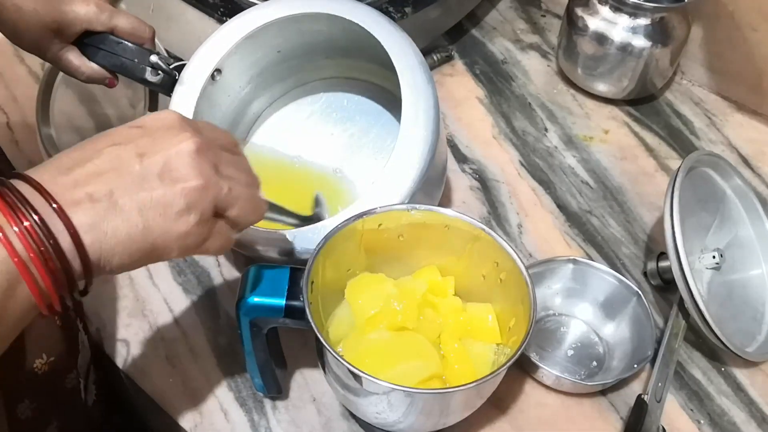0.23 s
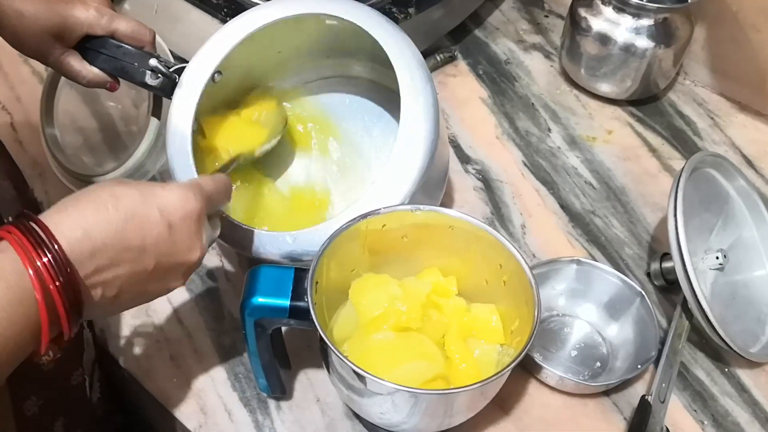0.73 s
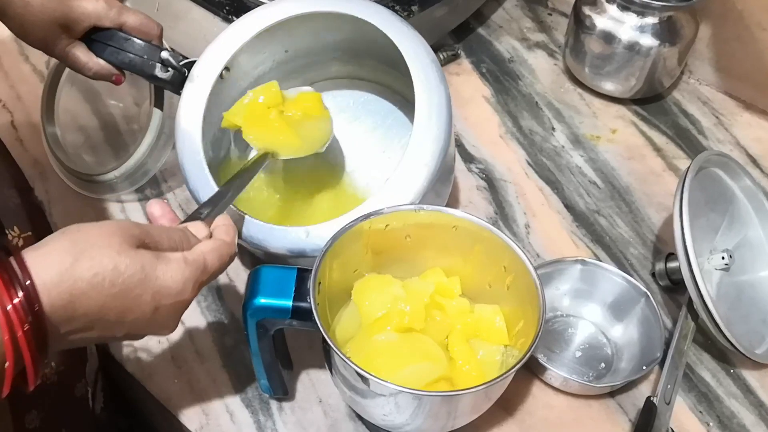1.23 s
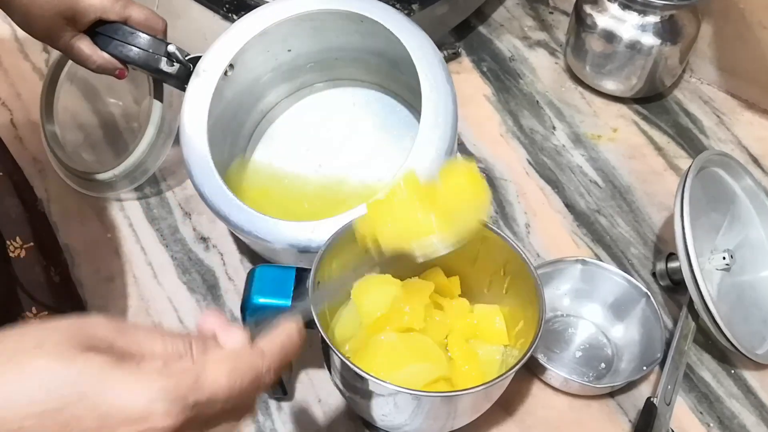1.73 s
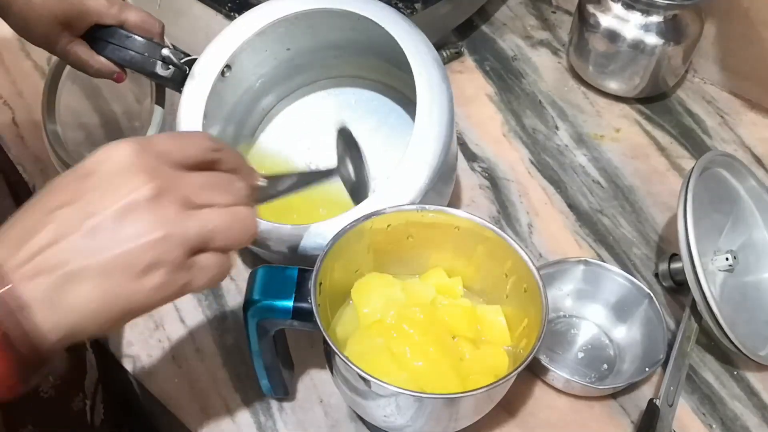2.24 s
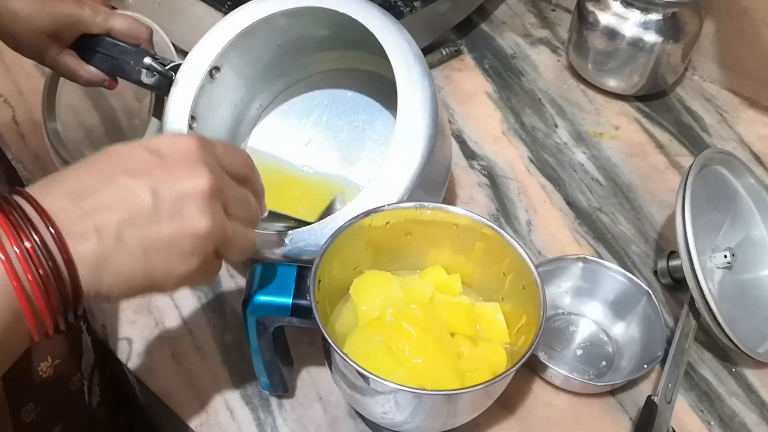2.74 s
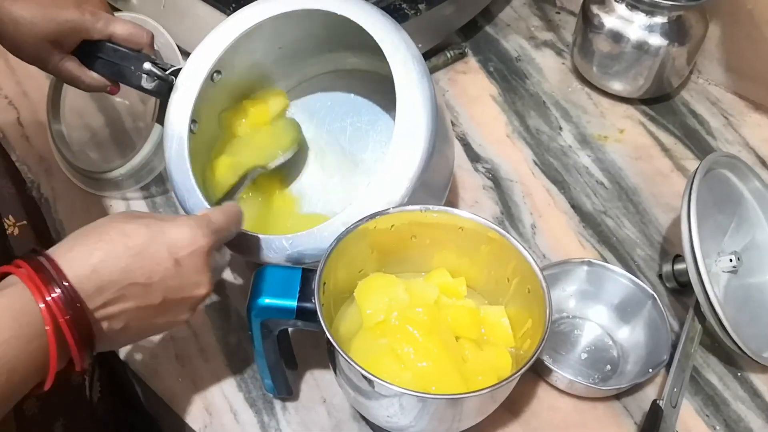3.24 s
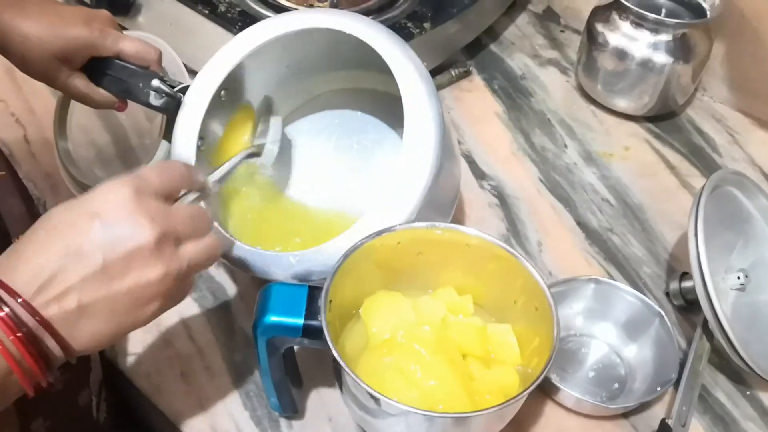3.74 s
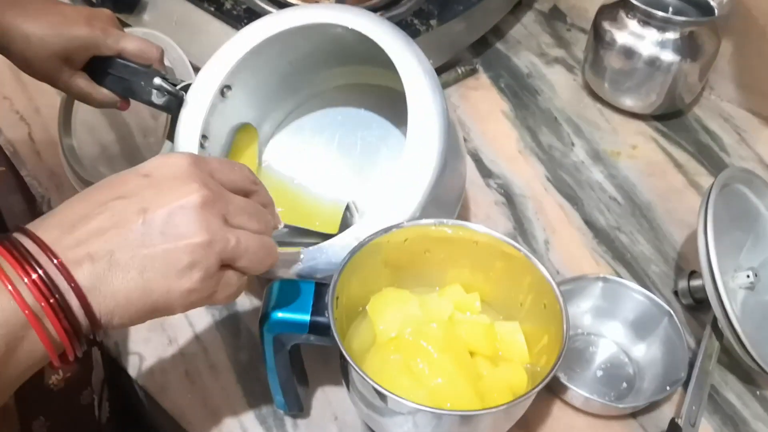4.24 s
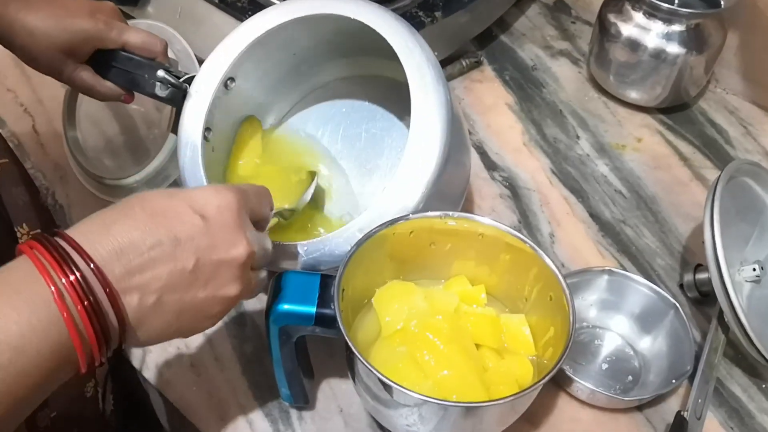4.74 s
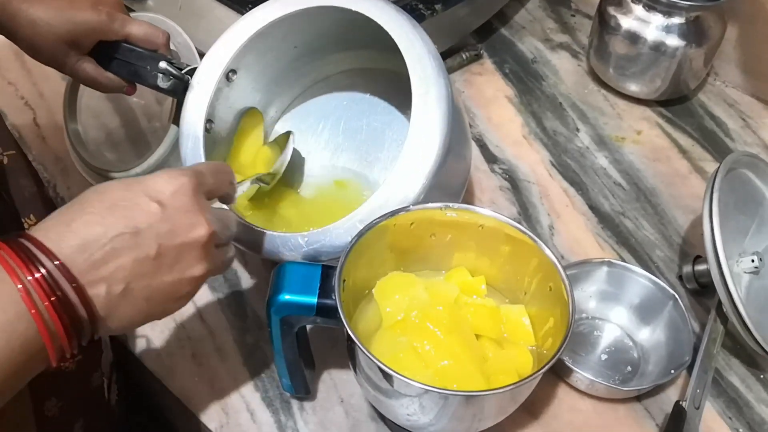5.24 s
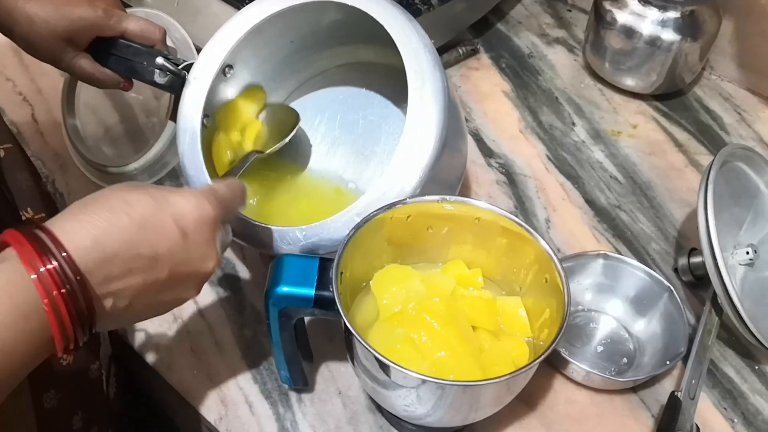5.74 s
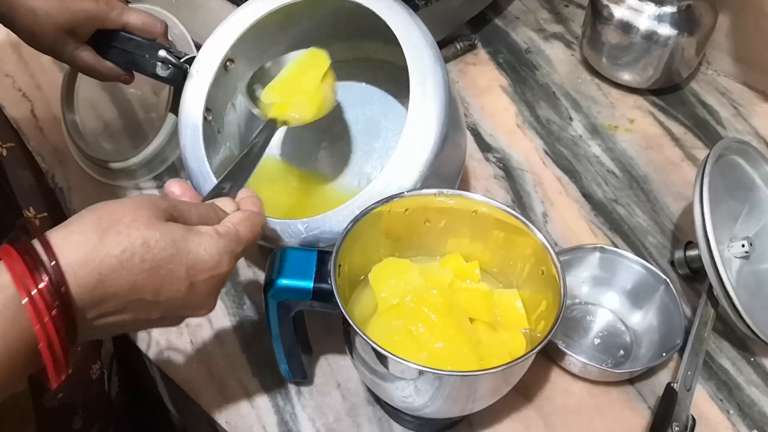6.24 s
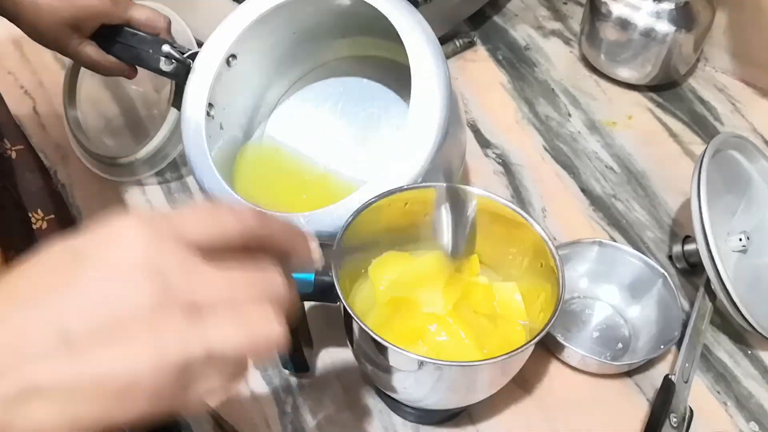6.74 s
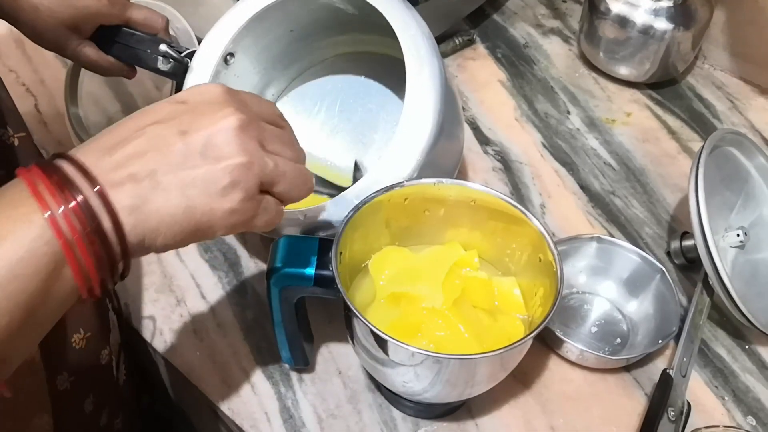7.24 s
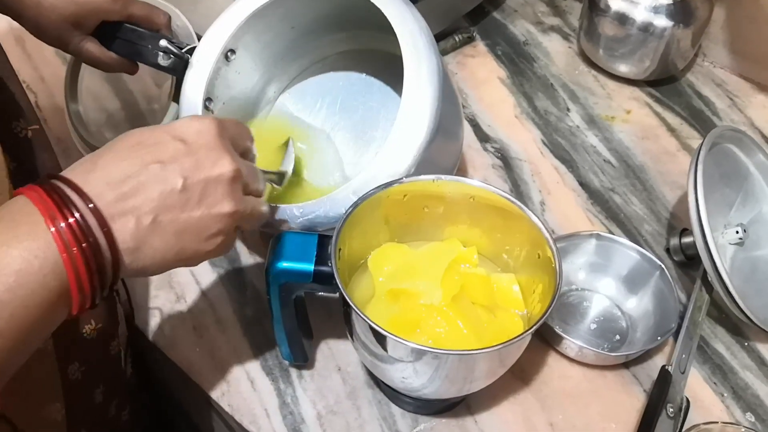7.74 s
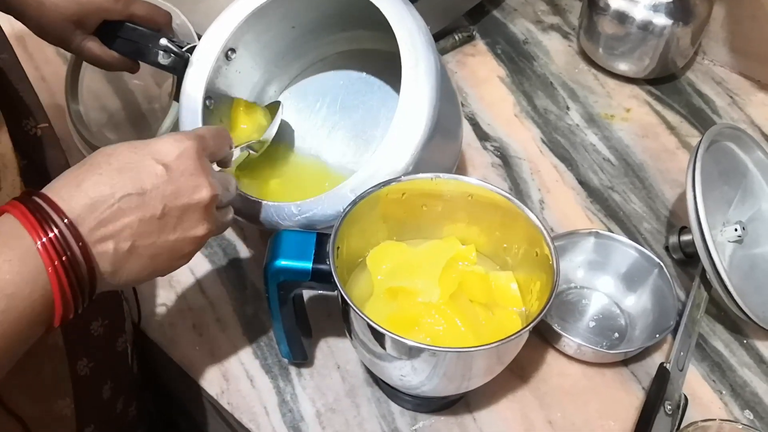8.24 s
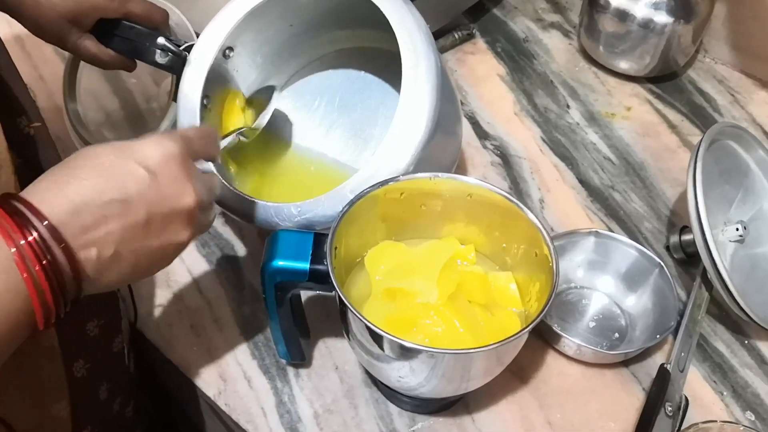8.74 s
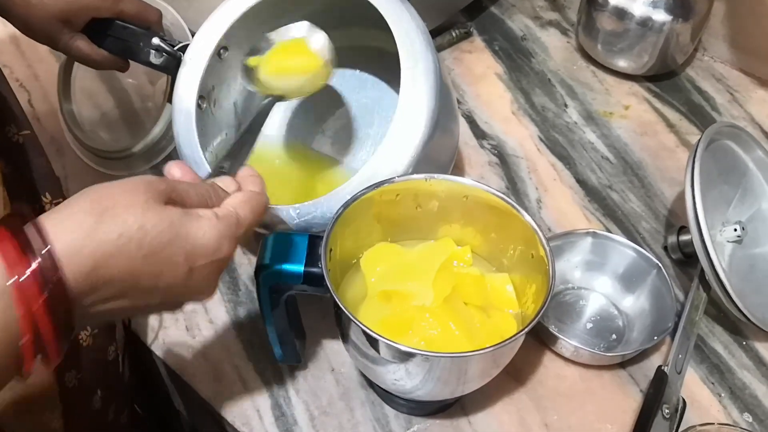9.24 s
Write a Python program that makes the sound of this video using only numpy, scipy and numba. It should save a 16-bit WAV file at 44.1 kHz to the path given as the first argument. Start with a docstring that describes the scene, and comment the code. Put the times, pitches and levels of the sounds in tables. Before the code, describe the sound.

Close stereo sound of fruit being ladled from a metal pot in a small, reflective kitchen. Short gritty metallic scrapes with a slightly singing edge come in groups, mixed with hollow knocks and bright, quickly damped clanks. Between scoops it falls almost silent, leaving tiny wet crackles, plops and high glassy bangle clinks over soft room air and a low hum. The brightest clanks come near six and nine seconds.

```python
"""Scooping fruit in a small kitchen

A steel ladle scoops soft boiled fruit out of a pressure cooker. Its knocks make ladle and pot ring together.
Scrapes are noisy friction fed through the pot's fixed resonances and the ladle's sliding ones.
Drips are short splats with a bubble tone, wet pulp crackles, and glass bangles clink as ringing tones.
Soft air noise and a quiet electric hum run throughout; hard walls add a short echoing tail."""
import sys
import numpy as np
from scipy import signal
from scipy.fft import rfft, irfft, next_fast_len
from scipy.io import wavfile
from numba import njit

SR = 44100
rng = np.random.default_rng(int(sys.argv[2]) if len(sys.argv) > 2 else 0)


def master(y):
    """Save y as 16-bit WAV."""
    cut = np.clip(np.atleast_2d(y).T, -1, 1)
    pcm = np.round(cut * 32767)  # scale
    wavfile.write(sys.argv[1], SR, pcm.astype(np.int16))


N = 418509
TIME = np.arange(N) / SR   # s

# soft air noise in the room, before its overall level: (f/Hz, level per Hz/dB)
AIR = [(15, -55), (25, -21.5), (70, -12), (92, -6.5), (217, -7.5), (344, -1.5), (516, -6.5), (1020, -11.5),
       (1290, -12.5), (1840, -18), (7510, -27.5), (9070, -23), (16000, -39.5)]
# how alike the air sounds on the left and right: (f/Hz, correlation)
AIR_LIKENESS = [(100, 0.9), (450, 0.78), (2500, 0)]
AIR_DB = -57.72
HUM_HZ, HUM_DB = 101, -69

# edges of the registers (pitch ranges) of a knock: f/Hz
KNOCK_REGISTERS_HZ = [330, 1000, 1500, 2700, 6500, 11000, 16000]
# ladle knocks on the cooker, before the knocks' shared gain: (t/s, level/dB, hardness/dB per octave,
# boom of the pot wall/dB, clank of the ladle bowl/dB, favoured mode f/Hz, its boost/dB,
# ring length factor, left minus right/dB)
KNOCKS = [(0.061, -29, -1, -5.5, 1.5, 1920, 8.5, 0.19, 1), (0.26, -27, 2, 5, -19, 3175, 11, 0.94, 1.5),
          (0.341, -31.5, 1.5, -10, -20, 6930, 26, 0.36, 2), (2.515, -58.5, -1, 5.5, -12, 1210, 18, 1, 1),
          (2.563, -32.5, -.5, -11.5, -1.5, 3535, 0, .62, 2),
          (3.227, -49, -2.5, -3.5, -4, 1210, -11, 0.94, 3), (3.33, -33, 1.5, 2.5, 2, 2190, 19, 0.44, -1),
          (3.731, -40.5, 3.5, -15, -6, 7607, 10, 0.23, 1), (4.218, -46, -3.5, -5, 3, 2190, 10, 0.57, .5),
          (5.861, -26, 0.5, -17.5, -7, 4450, 14, 0.52, 1),
          (6.091, -22, 3, -17.5, -12.5, 7876, 9.5, 0.55, 3), (7.265, -26.5, 1, -.5, -27, 1210, 11, 0.45, 0),
          (7.352, -35.5, 0, -.5, -25, 5420, 5.5, 0.34, -0.5),
          (7.451, -34.5, -1, -13, -13, 3040, 17, 0.27, 0), (7.801, -52.5, -5, 4, -8, 1265, 29, 0.84, -4.5),
          (8.03, -69, -8, 6, -10, 1265, 38, .8, -7), (8.106, -66.5, -6, 7.5, -2, 1265, 29, 0.73, -4),
          (9.074, -23.5, 4, -14, -8.5, 8560, 25, 0.59, -1)]
THUD_DB, TOP_DB = -13, -12.5   # every knock is weaker in its lowest and highest register
# ringing tones (modes) of the cooker: (f/Hz, relative level/dB, time to fall 60 dB at full ring length/s)
COOKER = [(497, -7, .4), (522, -10, .25), (1210, 0, .55), (1265, -13, .2), (1920, -4, .1), (2190, -9, .15),
          (2645, -23, .2), (3175, -9, .2), (3435, -6, .27), (3535, -4, .3), (3825, -9, .33),
          (4269, -10, .22), (4455, -11, .25), (4862, -10, .25), (5420, -11, .42), (5636, -7, .17),
          (6570, -10, .5), (6930, -6, .16), (7607, -8, .42), (7876, -6, .22), (8560, -6, .11),
          (9211, -7, .28), (9920, -8, .2), (10500, -9, .2), (11940, -13, .2), (13080, -14, .2),
          (14680, -17, .15)]
# ladle resonances at its rest pitch: (f/Hz, width/Hz, relative level/dB)
LADLE = [(800, 120, -11), (970, 40, -8), (1265, 25, -2), (2030, 28, 2), (3040, 40, -3), (3400, 120, -10),
         (4470, 45, -6), (6230, 70, -11), (6740, 100, -10), (7210, 80, -9), (8100, 220, -11),
         (9160, 120, -11)]
LADLE_PITCH_HZ = 2030   # rest pitch
# broad colour of rasps and crashes inside the pot: (f/Hz, relative level per Hz/dB)
FRICTION = [(250, -12.5), (480, -2), (800, -5.5), (1200, -3.5), (1600, -12), (2100, -10.5), (2550, -13),
            (3300, -2), (4000, -7.5), (5000, -5), (6500, -3), (9000, 2), (11500, -10), (15500, -16.5)]

# ladle strokes, each one push that bites, peaks and eases off while the ladle's pitch glides:
# (start t/s, peak t/s, end t/s, peak level/dB, easing/dB, drag on the base/dB, grit/dB, broad rasp/dB,
# first pitch f/Hz, last pitch f/Hz)
STROKES = [(0.097, 0.093, .255, -42, 6, 0, -8.5, -6, 1862, 2015),
           (.285, 0.306, .36, -34.5, 0, -6, 2, 6, 1934, 1912),
           (0.369, 0.383, .54, -35, 3, -1.5, -5, -1, 1930, 2056),
           (0.547, 0.568, .70, -35.5, 14.5, 1, -0.5, 0, 2072, 2124),
           (0.769, 0.793, .82, -45.5, 3.5, 7, 6, -5.5, 2063, 2090),
           (.83, 0.887, 1.02, -35.5, 28, -2.5, -4, 6, 2090, 1920),
           (2.70, 2.74, 2.915, -31.5, 17.5, -2, -5.5, -10, 2043, 2123),
           (2.939, 2.946, 3.19, -41.5, 13.5, -0.5, -2.5, -7.5, 2036, 2064),
           (3.404, 3.517, 3.58, -33.5, 16.5, -9.5, -3.5, -3, 1840, 2086),
           (4.25, 4.26, 4.32, -53.5, 1.5, 5.5, -9, -8, 2040, 1980),
           (4.328, 4.382, 4.45, -45, 11.5, 5, -6, -4, 2000, 1980),
           (4.463, 4.505, 4.56, -39, 30, -0.5, -7, -10, 2000, 1927),
           (4.63, 4.636, 4.86, -45.5, 10, -6, -5.5, -15.5, 2009, 2040),
           (6.996, 7.043, 7.245, -59, -2, -15, 5.5, 30, 2010, 2070),
           (7.466, 7.469, 7.57, -34, 27.5, -8.5, -3, -31, 2024, 1957),
           (7.61, 7.653, 7.79, -43, 9, -7, -3, -23, 2036, 2049),
           (7.816, 7.838, 7.98, -66, 5, 16, 11.5, -3, 2070, 2098),
           (8.009, 8.133, 8.20, -65, 12, 17, 14.5, -13, 2025, 2086),
           (8.338, 8.387, 8.48, -57.5, 14, 2, 0.5, -8, 1987, 2020),
           (8.811, 8.917, 9.04, -35.5, 14.5, -7, 0, 1.5, 1892, 2027)]
BITE_DB = 12   # pressure grows by this much from the start of a stroke to its peak
DRAG_FOLLOWS = 0.69   # share of the pressure swing that the low drag follows

# soft fruit sliding in the ladle and into the jar: (start t/s, end t/s, level/dB)
SQUELCHES = [(1.098, 1.804, -59.5), (1.9, 2.165, -55.5)]

# edges of the registers of a drip: f/Hz
DRIP_REGISTERS_HZ = [400, 1500, 6000, 15000]
# drips and plops of fruit, before the drips' shared gain: (t/s, bubble f/Hz, level/dB, sharpness/dB per octave)
DRIPS = [(1.111, 2140, -64, 9.5), (1.206, 8440, -62.5, -0.5), (1.256, 4400, -69, 11),
         (1.416, 4340, -58, 6.5), (1.452, 3480, -63.5, 11), (1.498, 1210, -56, 1), (1.516, 8550, -65, 3.5),
         (1.592, 1210, -52.5, 3.5), (1.712, 3350, -67.5, 2), (1.977, 8960, -57.5, -1),
         (2.065, 1870, -58, -5.5), (2.885, 2070, -53.5, 1.5), (4.927, 7440, -75, 4), (7.091, 7300, -64, 2)]

# edges of the registers of a bangle clink: f/Hz
CLINK_REGISTERS_HZ = [8000, 11500, 16000]
# bangle clinks, before the favoured register is lifted: (t/s, favoured mode f/Hz, level/dB)
CLINKS = [(2.097, 10600, -56), (2.304, 13150, -70), (2.518, 8530, -63.5), (3.141, 13150, -46.5),
          (3.254, 15550, -48.5), (3.266, 10120, -42), (3.662, 9870, -58.5), (3.719, 13150, -49),
          (3.853, 8530, -58.5), (5.846, 13150, -53), (5.894, 14680, -46.5), (6.013, 10120, -57),
          (6.694, 9168, -44), (6.957, 13150, -56), (6.99, 10600, -54.5)]
# glass bangle modes: (f/Hz, relative level/dB, time to fall 60 dB at full ring length/s)
BANGLES = [(8530, -20.5, 0.15), (9168, -15, 0.41), (9870, -15, 0.14), (10120, -9.5, 0.068),
           (10600, -14.5, .1), (13150, -16, .12), (14680, 9, 0.13), (15550, 3, .07)]

# the pot stands to the right, which changes the balance of the sides: (f/Hz, left minus right/dB)
SHADE = [(1200, -0.5), (2300, 1.5), (5000, 0), (8600, -5.5), (15000, -4)]
CUTOFF_HZ = 15900


def from_db(db):
    """Turn decibels into a gain."""
    return 10 ** (np.asarray(db) / 20)


def rms_one(x):
    """Scale a sound to an average strength (rms) of 1."""
    return x / np.sqrt(np.mean(x ** 2) + 1e-20)


def at_hz(points, hz):
    """Read a table between its points, on a log-frequency axis."""
    known_hz, values = np.transpose(points)
    return np.interp(np.log(hz + 1e-9), np.log(known_hz), values)


def band(x, low, high):
    """Keep the frequencies between low and high, in Hz."""
    return signal.sosfilt(signal.butter(4, [low, high], "band", fs=SR, output="sos"), x)


def colour(x, spectrum):
    """Give a sound a broad, smooth spectrum."""
    size = next_fast_len(x.shape[-1])
    gains = from_db(at_hz(spectrum, np.fft.rfftfreq(size, 1 / SR)))
    return irfft(rfft(x, size) * gains, size)[..., :x.shape[-1]]


def drift(t, rate):
    """Wander at random with a spread of about 1, taking a new value `rate` times a second."""
    steps = (t - t[0]) * rate
    return np.interp(steps, np.arange(4096), rng.standard_normal(4096))


def add(out, start_s, sound):
    """Mix a stereo sound in at its time."""
    at = max(round(start_s * SR), 0)
    out[:, at:at + sound.shape[1]] += sound[:, :N - at]


def room_air():
    """Soft steady air noise, plus an electric hum that wavers a little in pitch and level."""
    size = next_fast_len(N)
    hz = np.fft.rfftfreq(size, 1 / SR)
    alike = at_hz(AIR_LIKENESS, hz)
    mid, side = rfft(rng.standard_normal((2, size))) * from_db(at_hz(AIR, hz))
    # the share of side sound sets how alike left and right are
    side = np.sqrt((1 - alike) / (1 + alike)) * side
    air = irfft(mid + side * [[1], [-1]], size)[:, :N]
    air = air / np.std(air.mean(axis=0))
    hum = np.sin(2 * np.pi * HUM_HZ * TIME + 0.5 * drift(TIME, 17))
    hum = hum * from_db(0.5 * drift(TIME, 8.8))
    return from_db(AIR_DB) * air + from_db(HUM_DB) * rms_one(hum)


def register_levels(edges, level_db, tilt_db=0, favoured_hz=0, lift_db=0):
    """Set each register's level: harder contact tilts it upward, and the favoured mode's register is lifted."""
    low, high = np.array(edges[:-1]), np.array(edges[1:])
    centres = np.sqrt(low * high)
    octaves = np.log2(centres / centres[len(low) // 2])
    return level_db + tilt_db * octaves + lift_db * ((low <= favoured_hz) & (favoured_hz < high))


def strike(modes, edges, levels_db, favoured_hz, boost_db, length, crash_db, crash_t60, rise_s):
    """One blow: clear modes over a crash of dense short ones; contact sets how hard each register is driven."""
    t = np.arange(SR // 2) / SR
    hz, mode_db, t60 = np.transpose(modes)
    favoured = np.arange(len(hz)) == np.argmin(abs(hz - favoured_hz))
    gains = from_db(mode_db + boost_db * favoured + rng.normal(0, 2, len(hz)))
    # contact loads what is struck and detunes the modes a little at each blow, the high ones most
    hz = hz * (1 + np.minimum(hz / 2e6, .003) * rng.standard_normal(len(hz)))
    # high modes radiate in lobes, so they reach the two sides out of phase
    lobes = rng.standard_normal((2, len(hz))) * np.minimum(hz / 6000, .5)
    phases = rng.uniform(0, 2 * np.pi, len(hz)) + lobes
    fading = from_db(-60 * t / (t60[:, None] * length))
    rings = np.sin(2 * np.pi * hz[:, None] * t + phases[..., None]) * gains[:, None] * fading

    common = rms_one(colour(rng.standard_normal(len(t)), FRICTION))
    own = rms_one(colour(rng.standard_normal((2, len(t))), FRICTION))
    rattle_db = 2 * drift(t, 500)
    early, out = slice(0, SR // 30), 0
    for low, high, level_db in zip(edges, edges[1:], levels_db):
        apart = min(low / 3500, 1)   # higher registers differ more between the sides
        # the low dense modes die more slowly; crash_t60 holds for a register starting at 6000 Hz
        dying = from_db(rattle_db - 60 * t / crash_t60 * (low / 6000) ** .22)
        crash = (np.sqrt(1 - apart) * common + np.sqrt(apart) * own) * dying
        crash = band(crash, low, high)
        sound = rings[:, (hz >= low) & (hz < high)].sum(axis=1) + from_db(crash_db) * crash
        sound = sound * (1 - np.exp(-t / rise_s))
        # the level is that of the first thirtieth of a second
        out = out + from_db(level_db) * sound / np.sqrt(np.mean(sound[:, early] ** 2))
    return out


def knocks(gain_db=-2.0, ladle_db=-5):
    """The ladle meets the pot and both ring; where it lands decides whether the wall booms or the bowl clanks."""
    out = np.zeros((2, N))
    # a narrower resonance rings for longer
    ladle_modes = [(hz, level_db + ladle_db, np.log(1000) / np.pi / width) for hz, width, level_db in LADLE]
    modes = list(COOKER) + ladle_modes
    for s, level_db, hardness_db, boom_db, clank_db, favoured_hz, boost_db, length, pan_db in KNOCKS:
        levels_db = register_levels(KNOCK_REGISTERS_HZ, level_db, hardness_db)
        levels_db = levels_db + [THUD_DB, boom_db, clank_db, 0, 0, TOP_DB]
        blow = strike(modes, KNOCK_REGISTERS_HZ, levels_db, favoured_hz, boost_db, length,
                      crash_db=6, crash_t60=0.082, rise_s=0.0012)
        add(out, s, from_db(gain_db + pan_db * np.array([[.5], [-.5]])) * blow)
    return out


@njit
def resonate(x, hz, width):
    """A resonance with a peak gain of 1, whose centre may move."""
    y, r = np.zeros_like(x), np.exp(-np.pi * width / SR)
    for i in range(2, x.shape[1]):
        pull = 2 * r * np.cos(2 * np.pi * hz[i] / SR)
        for c in range(2):
            push = (1 - r * r) / 2 * (x[c, i] - x[c, i - 2])
            y[c, i] = push + pull * y[c, i - 1] - r * r * y[c, i - 2]
    return y


def friction(t, slips_per_s=1800, slip_db=0.0, hiss=1.0, judder_db=4.0, judder_per_s=130):
    """Dense tiny slips of uneven size over a smooth wet hiss, juddering together."""
    sizes = from_db(slip_db * np.minimum(rng.exponential(1, len(t)), 4))
    slips = (rng.random(len(t)) < slips_per_s / SR) * sizes * rng.standard_normal((2, len(t)))
    force = rms_one(slips) + hiss * rng.standard_normal((2, len(t)))
    force = force * from_db(judder_db * drift(t, judder_per_s))
    # long waves reach both sides alike
    mid, side = force
    side = signal.sosfilt(signal.butter(1, 1700, "high", fs=SR, output="sos"), side)
    return mid + side * np.array([[1], [-1]])


def dense_ring(x, ring_s=0.0048):
    """The pot's countless small modes give a rasp its uneven metallic colour."""
    t = np.arange(SR // 30) / SR
    response = rng.standard_normal(len(t)) * np.exp(-t / ring_s)
    response = response / np.linalg.norm(response)
    return signal.fftconvolve(x, response[None], axes=1)[:, :x.shape[1]]


def squeal(t, ladle_hz, waver_db=2.5, wobble=0.0042):
    """Stick and slip lock on to the ladle's sharp resonances, which sing and waver as they glide."""
    out = np.zeros((2, len(t)))
    turns = np.cumsum(ladle_hz / LADLE_PITCH_HZ * (1 + wobble * drift(t, 95))) / SR
    for hz, width, level_db in LADLE:
        if width < 50:   # only the sharp ones, in Hz
            lobes = rng.uniform(0, 2 * np.pi) + rng.standard_normal((2, 1)) * hz / 6000
            tone = np.sin(2 * np.pi * hz * turns + lobes)
            out += from_db(level_db + waver_db * drift(t, 28.9)) * tone
    return out


def scrapes(base_db=-3.5, wall_db=-2.5, treble_db=-0.5, ladle_db=3, squeal_db=-15, pot_db=9,
            pot_follows=0.72, bump_db=2.0, wander=0.00586, fade_s=.02):
    """Friction drives the pot's fixed modes and the ladle's sliding ones; raspier strokes ring the pot more."""
    out = np.zeros((2, N))
    for start, peak, end, peak_db, easing_db, drag_db, grit_db, rasp_db, first_hz, last_hz in STROKES:
        t = np.arange(start - fade_s, end + fade_s, 1 / SR)
        pressure_db = np.interp(t, [start, peak, end], [-BITE_DB, 0, -easing_db])
        ladle_hz = np.interp(t, [start, end], [first_hz, last_hz]) * (1 + wander * drift(t, 18.6))
        force = friction(t)

        sound = from_db(rasp_db) * colour(dense_ring(force), FRICTION)
        sound += from_db(squeal_db) * squeal(t, ladle_hz)
        for hz, width, level_db in LADLE:
            sliding_hz = hz * ladle_hz / LADLE_PITCH_HZ
            sound += from_db(level_db + ladle_db) * resonate(force, sliding_hz, width)
        for hz, level_db, t60 in COOKER:
            # the sliding ladle damps the pot and widens its modes
            ring = resonate(force, np.full(len(t), float(hz)), 4.4 / t60)
            sound += from_db(pot_db + pot_follows * rasp_db + level_db) * ring

        # the bowl bumps along the base, so the low drag is uneven
        low_db = base_db + drag_db + DRAG_FOLLOWS * pressure_db + bump_db * drift(t, 37.2)
        low = from_db(low_db) * rms_one(band(sound, 190, 1430))
        middle = from_db(wall_db + pressure_db) * rms_one(band(sound, 1540, 4550))
        treble = from_db(treble_db + grit_db + pressure_db) * rms_one(band(sound, 4720, 19845))
        fade = np.clip(np.minimum(t - t[0], t[-1] - t) / fade_s, 0, 1)
        add(out, t[0], from_db(peak_db) * (low + middle + treble) * fade)
    return out


def squelches():
    """Sparse small crackles of wet pulp swell and fade."""
    out = np.zeros((2, N))
    for start, end, level_db in SQUELCHES:
        t = np.arange(start, end, 1 / SR)
        crackle = friction(t, slips_per_s=250, slip_db=3.5, hiss=0.76, judder_db=9, judder_per_s=68.9)
        crackle = band(crackle, 1500, 11600)
        add(out, start, from_db(level_db) * rms_one(crackle * np.hanning(len(t))))
    return out


def drips(gain_db=-5.5, bubble_db=-9, bubble_t60=0.063):
    """Wet smacks: a short splat, a small bubble and a soft ring of the pot."""
    out = np.zeros((2, N))
    for s, bubble_hz, level_db, sharpness_db in DRIPS:
        modes = list(COOKER[:4]) + [(bubble_hz, bubble_db, bubble_t60)]
        levels_db = register_levels(DRIP_REGISTERS_HZ, level_db, sharpness_db, bubble_hz, lift_db=13.5)
        smack = strike(modes, DRIP_REGISTERS_HZ, levels_db, bubble_hz, boost_db=39, length=0.82,
                       crash_db=31.5, crash_t60=0.034, rise_s=0.00025)
        add(out, s, smack)
    return from_db(gain_db) * out


def bangles(pan_db=-5):
    """Glass rings tap each other as the wrist turns, and ring briefly."""
    out = np.zeros((2, N))
    for s, favoured_hz, level_db in CLINKS:
        levels_db = register_levels(CLINK_REGISTERS_HZ, level_db, favoured_hz=favoured_hz, lift_db=4.5)
        clink = strike(BANGLES, CLINK_REGISTERS_HZ, levels_db, favoured_hz, boost_db=31, length=0.34,
                       crash_db=13.5, crash_t60=0.086, rise_s=0.00019)
        add(out, s, clink)
    return out * from_db(pan_db * np.array([[.5], [-.5]]))


def placed(x):
    """The pot stands to the right: the left side hears everything slightly later and duller."""
    half_db = [(hz, balance_db / 2) for hz, balance_db in SHADE]
    left = colour(x[0], half_db)
    right = colour(x[1], [(hz, -level_db) for hz, level_db in half_db])
    return np.array([np.roll(left, 5), right])   # 5 samples late


def kitchen(x, t60=0.49, treble_t60=0.31, wet_db=-11):
    """Hard walls close by return a short diffuse tail, different on each side."""
    t = np.arange(SR // 2) / SR
    # the tail starts after 4 ms and builds up over 5.7 ms
    noise = rng.standard_normal((2, len(t))) * np.clip((t - .004) / 0.0057, 0, 1)
    tail = band(noise, 150, 6000) * from_db(-60 * t / t60)
    tail = tail + band(noise, 6000, 17000) * from_db(-60 * t / treble_t60)
    tail = from_db(wet_db) * rms_one(tail) / np.sqrt(len(t))
    return x + signal.fftconvolve(x, tail, axes=1)[:, :N]


def scene():
    """Ladle, fruit and bangles sound in the kitchen, over its air and hum."""
    sources = knocks() + scrapes() + squelches() + drips() + bangles()
    return room_air() + kitchen(placed(sources))


def record(dry):
    """Cut the top steeply above the cutoff."""
    return signal.sosfilt(signal.ellip(10, .2, 80, CUTOFF_HZ, fs=SR, output="sos"), dry)


dry = scene()
out = record(dry)
master(out)
```